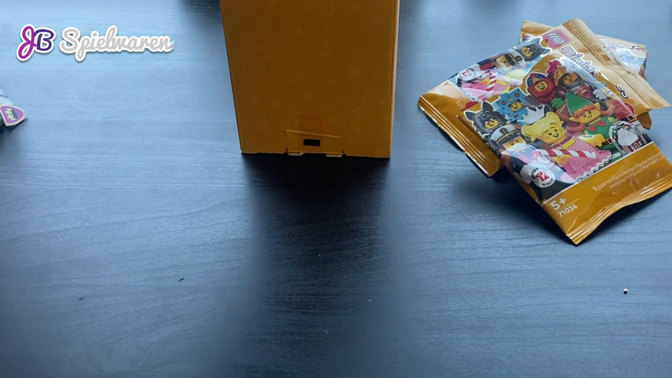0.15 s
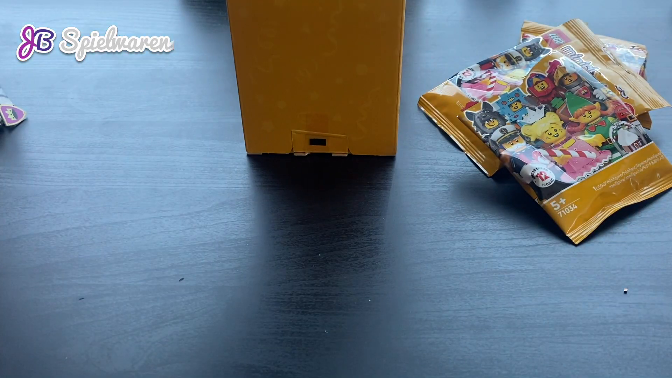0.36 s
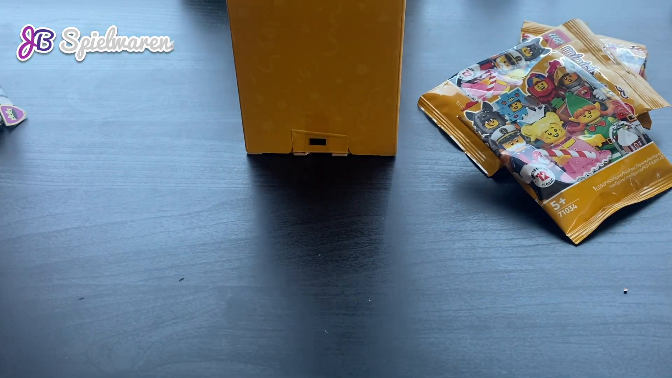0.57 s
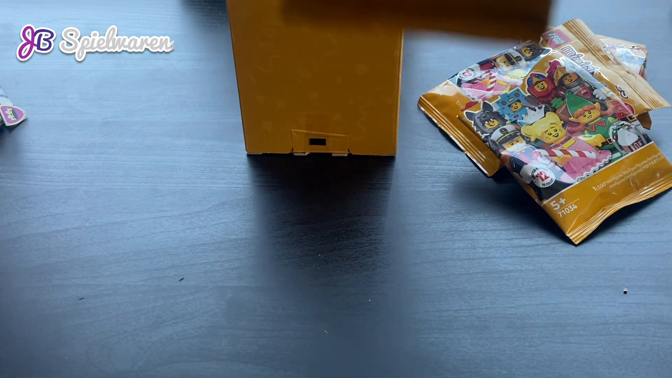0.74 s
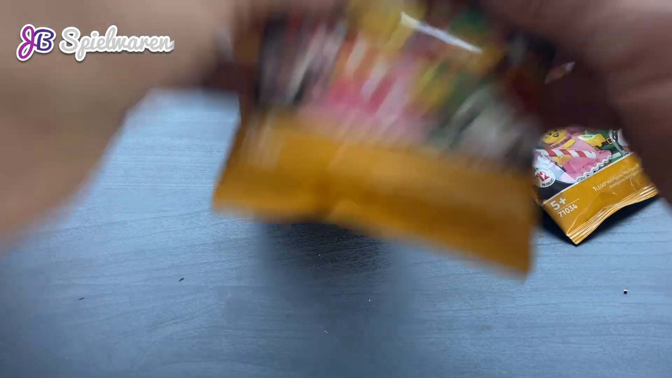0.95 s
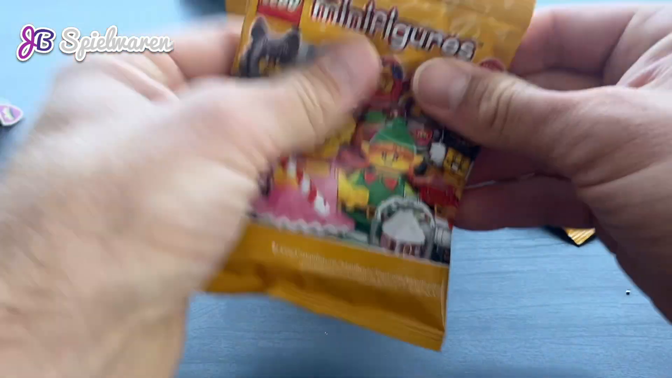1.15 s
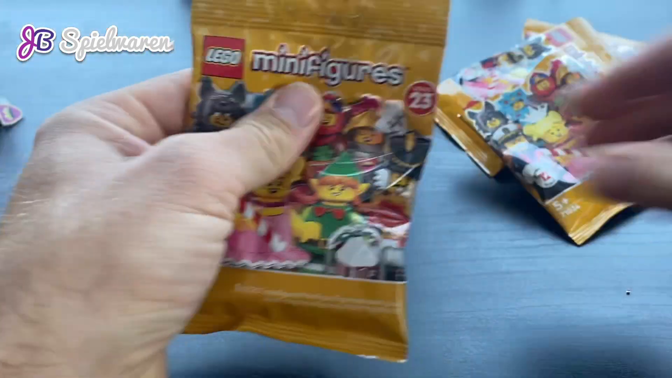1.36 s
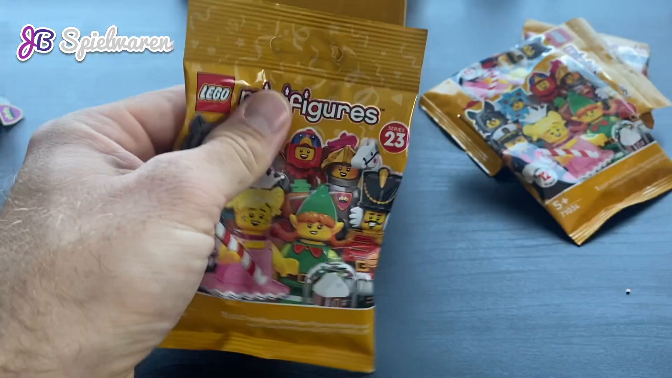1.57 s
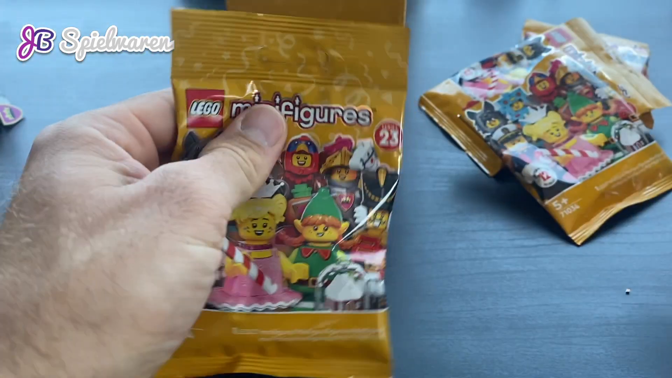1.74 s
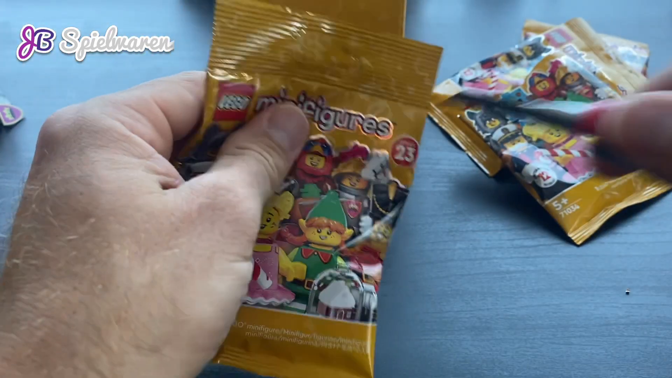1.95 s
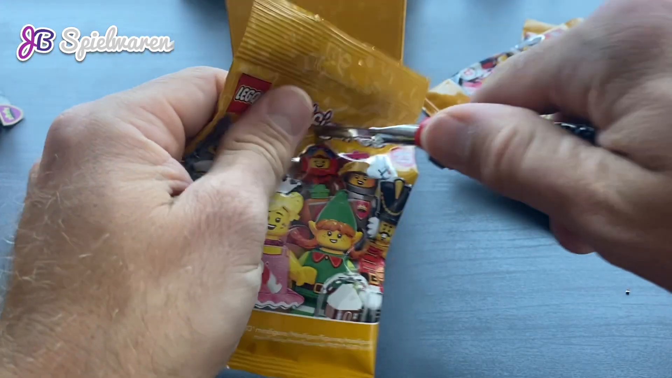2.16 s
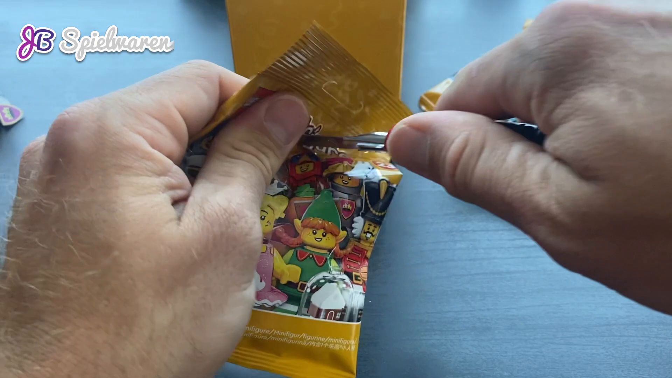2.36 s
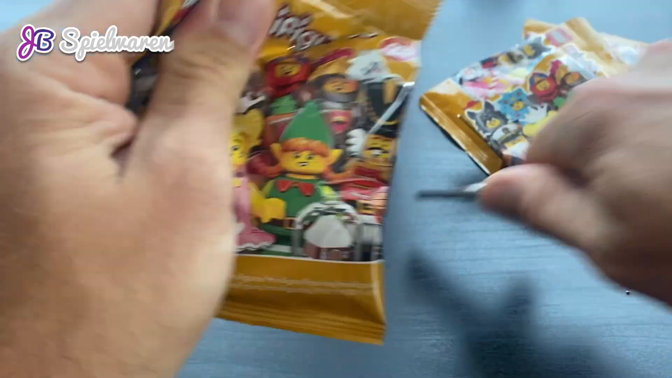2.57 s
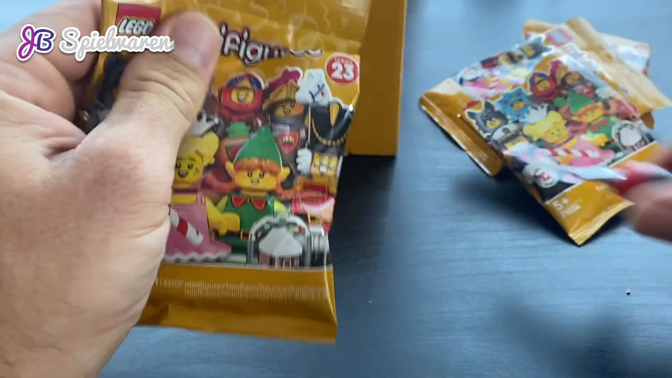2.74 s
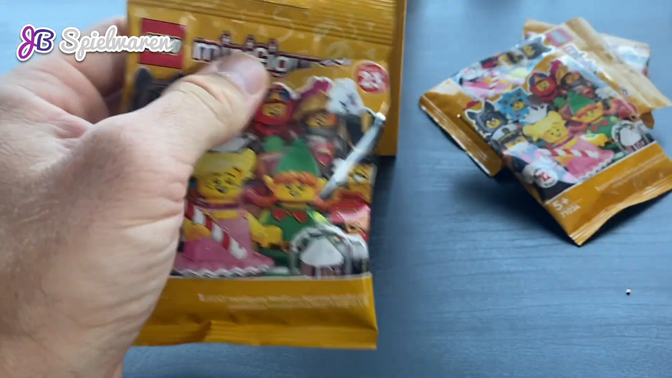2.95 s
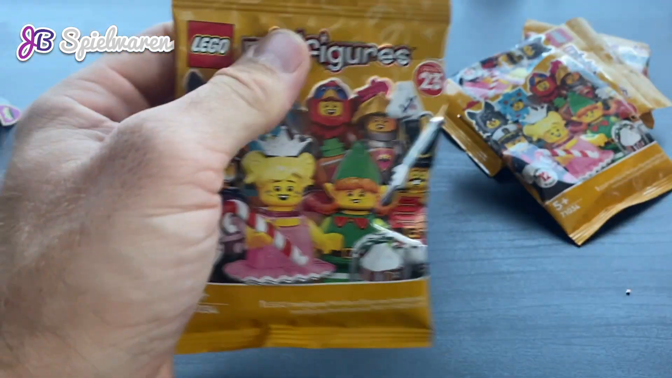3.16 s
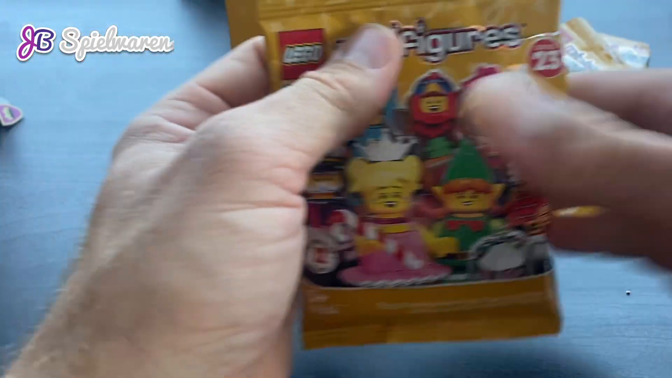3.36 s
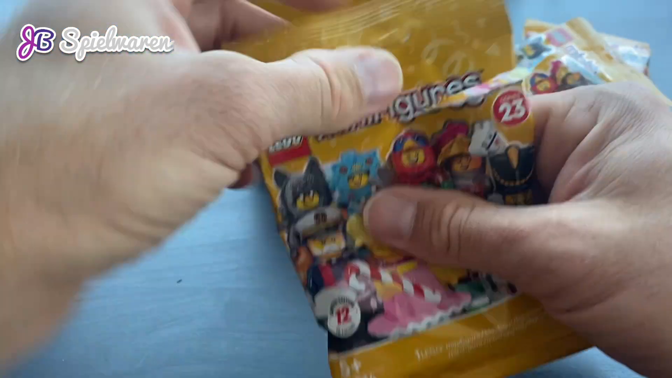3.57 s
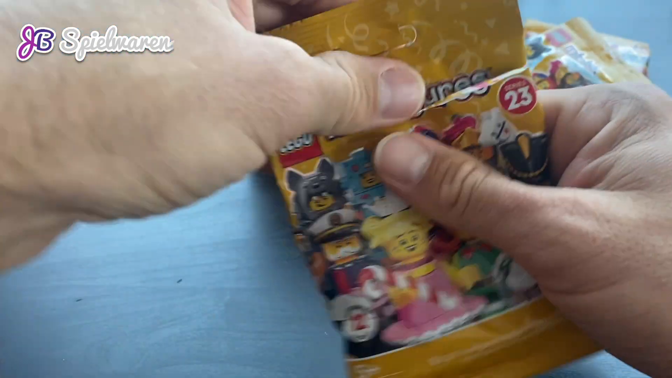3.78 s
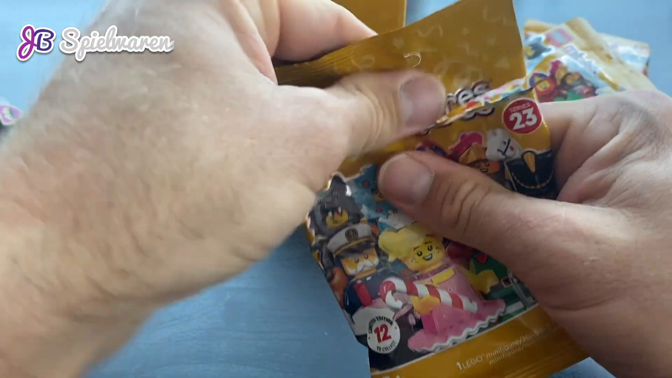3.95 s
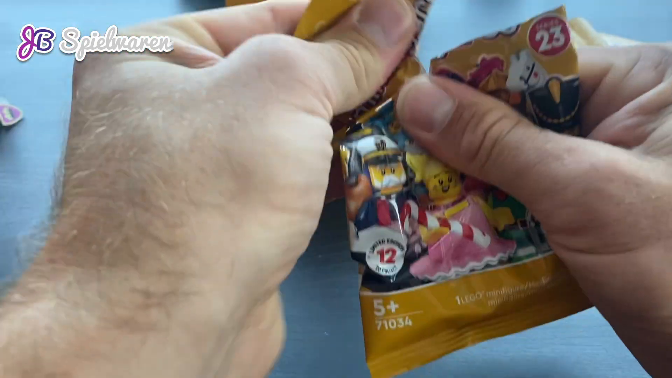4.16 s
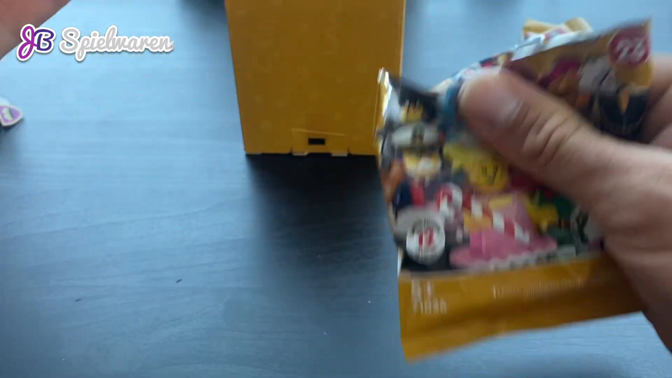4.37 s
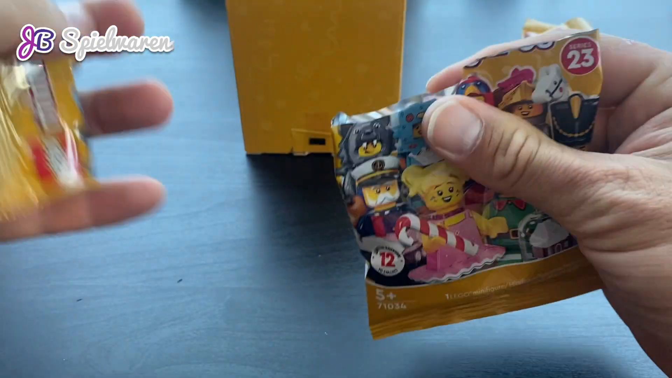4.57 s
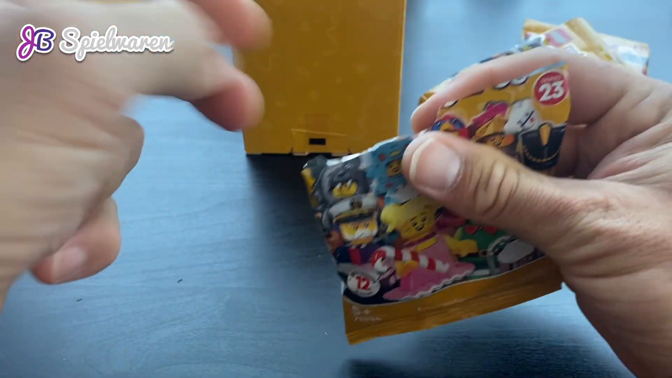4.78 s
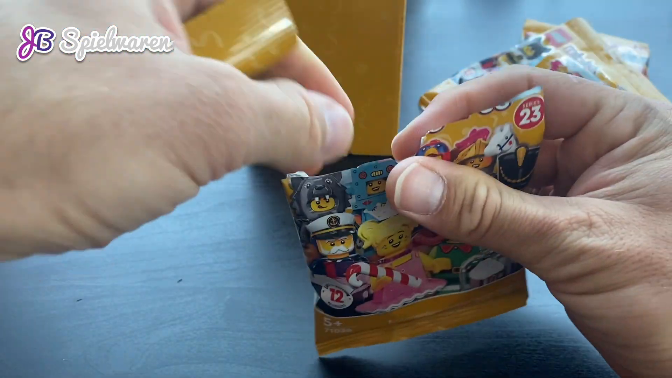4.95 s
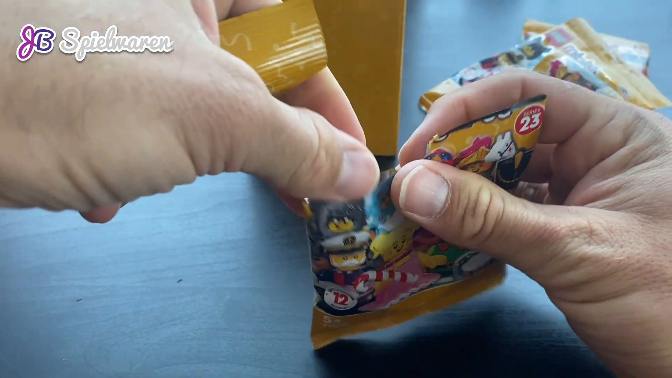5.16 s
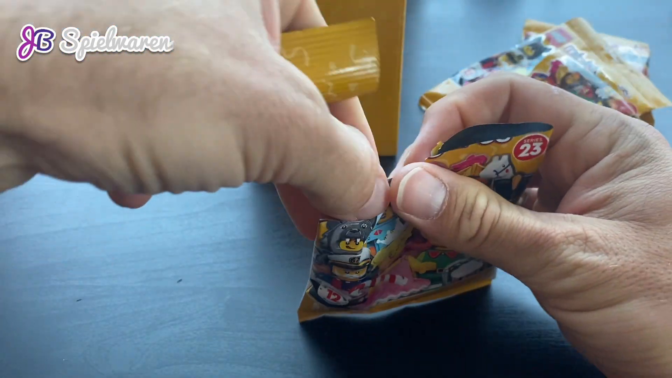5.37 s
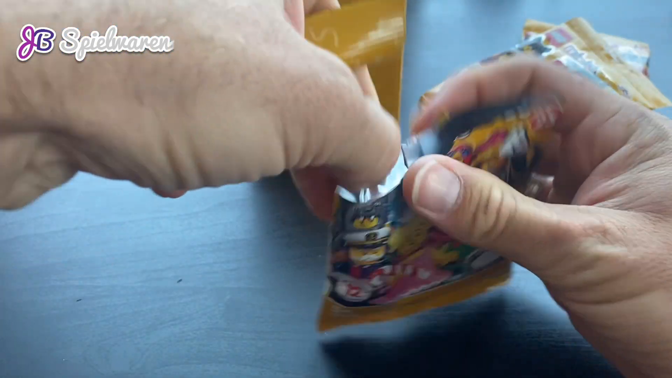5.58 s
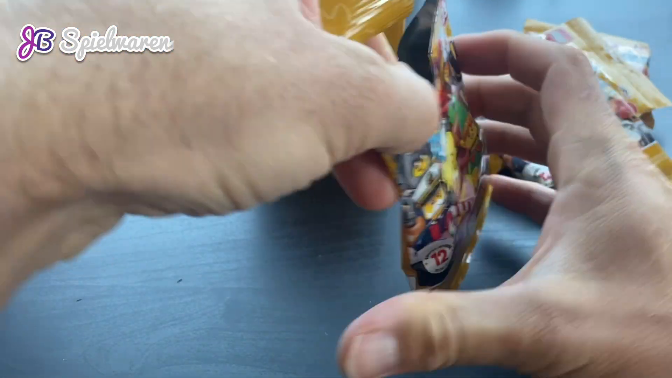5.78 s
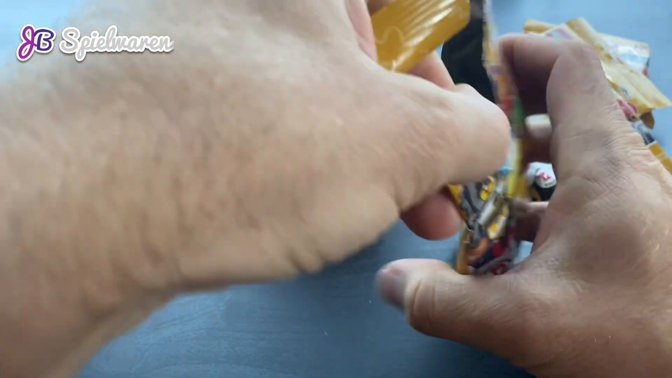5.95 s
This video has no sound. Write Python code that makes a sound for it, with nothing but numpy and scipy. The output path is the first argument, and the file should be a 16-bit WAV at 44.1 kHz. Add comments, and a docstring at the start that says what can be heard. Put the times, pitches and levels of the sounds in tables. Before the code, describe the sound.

Hollow cardboard rubbing, then close, dry foil crackling with quick rips and low pops, a light table knock midway, and sparser crinkles to the end.

```python
"""Something rubs along a hollow cardboard box on a wooden table; a foil packet is pierced and torn open.
Creases snap one by one over a finer crinkle, with rips and low pops; midway a small knife is put down.
Noise bursts ringing in facets make the foil, decaying modes the table, resonant friction the box.
Small room, two closely spaced microphones; the fingers work mostly nearer the left one."""
import sys
import numpy as np
from scipy import signal
from scipy.fft import rfft, irfft
from scipy.io import wavfile
from scipy.ndimage import uniform_filter1d

SR = 44100
rng = np.random.default_rng(int(sys.argv[2]) if len(sys.argv) > 2 else 0)


def transcribe(signal):
    """Save signal, clipped to [-1, 1], as a 16-bit WAV file at the path in sys.argv[1]."""
    frames = np.atleast_2d(signal).T
    limited = np.clip(frames, -1, 1)
    pcm = np.round(limited * 32767).astype(np.int16)
    wavfile.write(sys.argv[1], SR, pcm)


N = 265482

# colour of the still room's air: (frequency [Hz], relative spectrum level [dB])
AIR_COLOUR = [(30, 31), (100, 29.5), (400, -6.5), (16000, -29.5)]
# reflections from near surfaces: (delay left [ms], delay right [ms], level [dB])
NEAR_ECHOES = [(9.2, 9.7, -16.5)]
ECHO_DULL_HZ = 9000   # the surfaces swallow the top of the treble
# reverberation bands: (low edge [Hz], high edge [Hz], relative energy [dB], t60 [s])
ROOM_TAIL = [(101.7, 330, -21.5, 0.87), (487, 1040, -11, 0.14), (1560, 5540, -10, 0.2),
             (4500, 7400, -19.5, 0.11), (7900, 36000, -18.5, 0.19)]
# hard things nearby that ring on: (frequency [Hz], relative level [dB])
NEARBY_RINGS = [(841, -15.5), (999, -19), (2460, -17), (3603, -19.5)]
NEARBY_T60_S = 0.15
# soft bumps of hands and arms: (time [s], level [dB], spread of the swell [s])
SOFT_BUMPS = [(0.25, -52.5, 0.042), (0.99, -42.5, 0.037), (1.405, -44, 0.016), (1.46, -34.5, 0.02),
              (1.51, -48, 0.023), (1.595, -38.5, 0.018), (2.943, -58, 0.062), (3.789, -31, 0.0095),
              (3.9, -45.5, 0.031), (4.254, -53, 0.08)]
# knocks of knife and hands on the table: (time [s], relative level [dB], contact sharpness [Hz])
TABLE_CONTACTS = [(1.589, -42, 500), (1.596, -37.5, 900), (1.613, -47, 900), (2.877, -45, 704),
                  (2.995, -43, 1200), (3.111, -30, 1500), (3.135, -29, 920), (3.169, -32, 1370),
                  (3.19, -35, 900)]
# modes struck by each knock, of the table top and (1070 and 1460 Hz) the knife: (nominal frequency [Hz], mean
# relative level [dB], t60 [s])
KNOCK_MODES = [(101, 7, 0.078), (136.8, 4, 0.34), (242.3, 5.5, 0.16), (282, 14, 0.034), (373, 5.5, 0.15),
               (460, -4.5, 0.37), (516, 7, 0.11), (544, 5.5, 0.14), (632, 0.5, 0.06), (685, 0, 0.071),
               (1070, -3, 0.17), (1460, 1, 0.13)]
# panels of the cardboard box: (frequency [Hz], width [Hz], relative level [dB])
BOX_PANELS = [(239.7, 14, 1), (390, 36, -3.5), (635, 107, -1.5), (800, 260, -6)]
# rubs along the box: (time [s], spread [s], level [dB], relative hollow ring [dB], nominal hollow pitch [Hz])
BOX_RUBS = [(0.045, 0.012, -41.5, 0.5, 649.3), (0.1, 0.019, -41.5, -1, 701.4), (0.183, 0.01, -49.5, 4, 681),
            (0.247, 0.024, -37, 0, 756), (0.352, 0.0098, -43, -15, 687.7), (0.379, 0.017, -43, 11.5, 690.6),
            (0.438, 0.0033, -43, 9.5, 749.3)]
HOLLOW_WIDTH_HZ = 51
# fingertips sliding on the film: (time [s], spread [s], rasp level [dB], hiss level [dB])
FINGER_STROKES = [(1.136, 0.012, -38, -47), (1.182, 0.014, -34.5, -50), (1.536, 0.021, -41, -52),
                  (1.707, 0.021, -46.5, -43), (2.938, 0.065, -51.5, -54.5), (3.003, 0.0065, -36.5, -46),
                  (3.656, 0.0066, -45, -52), (5.07, 0.0076, -51, -63.5), (5.287, 0.067, -48.5, -48),
                  (5.828, 0.0056, -34, -52)]
# colour of the rasp: (frequency [Hz], relative spectrum level [dB])
RASP_COLOUR = [(250, -0.5), (900, 6), (1600, 1.5), (3000, -1)]
# colour of the whole sheet's crinkle: (frequency [Hz], relative spectrum level [dB])
SHEET_COLOUR = [(120, -3.5), (320, 2), (700, -4), (1200, -4), (2800, -2)]
# colour of the small facets' crinkle: (frequency [Hz], relative spectrum level [dB])
FACET_COLOUR = [(4000, 12), (6500, 10), (10000, 5), (14000, -5.5)]
# squeezes and shifts of the grip: (time [s], length [s], relative level [dB], relative crispness [dB])
FINGER_GRIPS = [(0.025, 0.17, -41.5, -3.5), (0.201, 0.061, -42.5, -2.5), (0.338, 0.11, -42, -2.5),
                (0.518, 0.17, -48, -16), (0.779, 0.06, -29.5, 0), (0.932, 0.064, -27, -1),
                (1.071, 0.4, -44, -8), (1.564, 0.16, -46, -5.5), (2.088, 0.065, -35, 0.5),
                (2.614, 0.18, -48, -1.5), (3.395, 0.18, -32, -2.5), (3.675, 0.12, -37.5, -1),
                (3.794, 0.2, -48, -5), (3.972, 0.052, -32.5, 0.5), (4.174, 0.0287, -45, 7),
                (4.374, 0.058, -38, -2.5), (4.477, 0.11, -46.5, 8), (4.639, 0.086, -45, 6),
                (5.15, 0.038, -40, 1), (5.229, 0.24, -50.5, -4.5), (5.494, 0.053, -38, 0),
                (5.61, 0.076, -45.5, 0), (5.777, 0.1, -43.5, -6), (5.982, .04, -39.5, -9)]
GRIP_ATTACK_S, GRIP_SAG_DB_PER_S, GRIP_RELEASE_DB_PER_S = 0.011, 38, 338.5
RESTING_DB = -59   # the packet stirs even when it is only held
BUCKLE_DB, BUCKLE_RANGE_DB = -43, 6.5   # below this pressure fingers mostly slide, above it film buckles
# rips, where cracks run together: (start [s], end [s], body level [dB], crisp level [dB])
RIP_RUNS = [(0.955, 0.971, -28, -24.5), (2.434, 2.467, -17.5, -23), (2.445, 2.473, -29, -27),
            (3.991, 4.002, -35, -21), (4.178, 4.211, -23, -21.5), (4.694, 4.733, -47, -32.5)]
# the whole packet buckles: (time [s], relative level [dB], pitch [Hz])
PACKET_POPS = [(0.977, -18.5, 374), (1.012, -23.5, 400), (2.44, -20, 408), (2.4707, -14.5, 246),
               (4.168, -23.5, 282), (4.202, -25, 394)]
POP_T60_S, POP_RISE_S = 0.027, 0.00017
# single creases: (time [s], relative level [dB], relative brightness [dB per octave], facet pitch [Hz])
CREASE_SNAPS = [(0.111, -40, -0.5, 696), (0.3028, -34.5, 3.5, 1740), (0.3349, -39.5, 5.5, 5700),
                (0.3488, -36, 5.5, 7800), (0.4965, -47.5, -0.5, 1620), (0.587, -45, -0.5, 1320),
                (0.635, -51, 0.5, 3290), (0.6565, -56, -1, 1680), (0.679, -50, -2.5, 1170),
                (0.7099, -51.5, 5.5, 5830), (0.784, -29.5, -2, 1580), (0.7961, -19, 1, 10300),
                (0.8022, -24, 1, 1750), (0.818, -42, 8.5, 6560), (0.8291, -31.5, 5.5, 1420),
                (0.8497, -24, 3, 6140), (0.8572, -30, -0.5, 9300), (0.882, -30, 2, 1320),
                (0.906, -35, 3, 2630), (0.9338, -31, 2, 7790), (0.949, -29.5, 4, 1410),
                (0.9585, -38.5, 7.5, 8700), (0.9666, -41.5, 8.5, 2740), (0.9861, -35, 1.5, 1900),
                (1.031, -37.5, 3.5, 980), (1.043, -35.5, 3, 1640), (1.0722, -33.5, 2, 1450),
                (1.0746, -44, 3, 1400), (1.112, -31.5, 2.5, 9400), (1.168, -32, 3.5, 826),
                (1.172, -41, 5, 960), (1.218, -32, 2, 1690), (1.2278, -29, 3.5, 9000),
                (1.239, -41, 5, 9260), (1.252, -37.5, 3.5, 3260), (1.263, -32.5, 3.5, 1680),
                (1.2749, -30.5, 1, 3220), (1.281, -31.5, 3, 4760), (1.2957, -35, 0, 1670),
                (1.341, -51.5, -3, 830), (1.367, -35.5, 0.5, 9100), (1.378, -37, 2, 7790),
                (1.3949, -36.5, 4.5, 830), (1.413, -37, 3, 930), (1.5401, -38, 0.5, 5200),
                (1.5697, -34.5, 0, 1170), (1.8121, -35.5, 0, 870), (1.831, -35.5, 4, 2280),
                (1.866, -46, 1, 830), (1.934, -36.5, 3.5, 1400), (1.969, -38.5, 1.5, 990),
                (1.988, -42, 0.5, 1700), (2.0087, -48.5, 0.5, 1990), (2.0888, -34, 0.8, 1140),
                (2.0984, -38.5, -4, 985), (2.136, -30.5, 1.5, 4000), (2.145, -37, 5, 6700),
                (2.1497, -45, 8, 8950), (2.1787, -40, 2.5, 7790), (2.2097, -31, 3, 9200),
                (2.329, -28, 3, 10800), (2.352, -40.5, 0.5, 9400), (2.3778, -49.5, 4, 4600),
                (2.418, -40.5, 3.5, 3290), (2.441, -22, 2, 970), (2.4636, -17, 1, 1010),
                (2.468, -20.5, 0, 2710), (2.476, -37, 6, 980), (2.5319, -32.5, 2.5, 1880),
                (2.599, -36.5, 4, 6900), (2.6223, -36, 2.5, 1380), (2.6702, -45.5, 4, 1380),
                (2.695, -44.5, -2, 4000), (2.719, -44.5, -1, 1920), (2.743, -41.5, 6.5, 2000),
                (2.7584, -41, 1.5, 5460), (2.78, -45.5, 2, 4500), (2.804, -43, -1.5, 960),
                (2.8537, -42.5, 4, 5200), (2.8643, -44.5, 1.5, 3880), (2.971, -39.5, 1.5, 960),
                (3.027, -35.5, 0, 9150), (3.0296, -34.5, 3, 4630), (3.0331, -34.5, 1.5, 2720),
                (3.0997, -39, 0, 2000), (3.1125, -31, 0, 1310), (3.119, -37, -1.5, 1900),
                (3.133, -41, 0, 1300), (3.171, -42.5, -4, 1100), (3.288, -53, -1.5, 1650),
                (3.316, -47, 1, 3270), (3.3499, -41.5, 4, 3370), (3.402, -34, -0.5, 5500),
                (3.4109, -32.5, 5, 2740), (3.422, -30, 2, 740), (3.4464, -32.5, 2.5, 820),
                (3.465, -41, 5, 3910), (3.486, -41.5, 4.5, 7740), (3.5337, -31, 1, 9000),
                (3.5469, -37, -2.5, 3370), (3.709, -34.5, -0.3, 5560), (3.7322, -43, 2, 2800),
                (3.753, -33, 0.5, 5400), (3.8043, -35, 2, 9200), (3.832, -36, 1, 910),
                (3.872, -35, 3, 1450), (3.9325, -40, 1, 1610), (3.9401, -41.5, -1, 3260),
                (3.955, -40.5, 2.5, 4060), (3.9764, -41.5, 2.5, 4650), (3.991, -34.5, 4.5, 3200),
                (3.997, -32, 0, 9260), (4.0073, -39, 2.5, 3240), (4.0269, -32.5, 3, 2720),
                (4.04, -42, 4, 3300), (4.155, -57, 15, 590), (4.1637, -22, 1.5, 9400),
                (4.174, -26.5, 4.5, 5660), (4.1976, -30, 5.5, 7660), (4.2176, -30.5, 4, 2320),
                (4.2507, -37.5, 4, 1420), (4.311, -41, 6, 4000), (4.321, -42, 3.5, 2970),
                (4.3655, -46, 2.5, 7300), (4.3808, -44, 5.5, 1960), (4.4218, -36.5, 2.5, 735),
                (4.4327, -42, -2, 1140), (4.451, -45.5, 2.5, 4500), (4.49, -43.5, 0.5, 4570),
                (4.5435, -37.5, 7, 6940), (4.556, -45, 2, 5440), (4.581, -47.5, 6, 5660),
                (4.625, -38.5, 5, 3670), (4.6535, -36, 6.5, 7240), (4.6568, -28, 6.5, 5400),
                (4.66, -31.5, 6, 7050), (4.675, -33.5, 3, 3900), (4.698, -40, 6.5, 5400),
                (4.713, -44, 8, 7000), (4.721, -40, 8.5, 7800), (4.771, -40, 2.5, 1160),
                (4.8256, -39, 3.5, 1640), (4.837, -32.5, 1.4, 1150), (4.885, -34, 1, 9300),
                (4.9278, -43, 4.5, 2410), (5.136, -33, 0.5, 3130), (5.1793, -41, 2.5, 9200),
                (5.2291, -41, -0.5, 3100), (5.2933, -51, 2, 9260), (5.358, -50.5, 3.5, 1380),
                (5.4473, -51, 2.5, 11000), (5.462, -49.5, 1.5, 2280), (5.504, -45.5, 2, 6540),
                (5.5366, -32.5, 3, 1140), (5.5587, -27.5, 0.5, 1140), (5.635, -37, 0.5, 2600),
                (5.646, -40, 4.5, 3160), (5.6878, -47, 4, 1170), (5.9414, -44.5, 2, 2280),
                (6.0137, -34.5, -1, 1380)]
# how the film radiates: (low edge [Hz], high edge [Hz], relative share [dB], t60 [ms], lateness [ms])
FILM_BANDS = [(126, 457, -1, 34.5, 1.3), (340, 860, -2.5, 18, 0.23), (760, 2680, 3, 21, 0.36),
              (2880, 5560, 0.5, 17.5, 0.028), (4760, 8540, 0.5, 10, 0.0084), (7900, 12140, -6.5, 12.4, .02),
              (11200, 16000, -12, 7.7, .01)]
# where the fingers work the film: (time [s], mean lead at the left microphone [ms])
FINGER_PLACE = [(0, 0.075), (.85, 0.06), (1.3, 0.052), (1.95, 0.11), (2.5, 0.095), (3.05, -0.017),
                (3.75, 0.099), (4.2, 0.041), (4.62, -0.036), (4.85, 0.11), (6.0, 0.0043)]
# a snap's brightness tilts its spectrum about the pivot and levels off at the top
SNAP_PIVOT_HZ, SNAP_TOP_HZ = 1900, 9500
# brighter snaps come from narrow strips, which lose lows: dB lost per step of extra brightness
NARROW_DB_PER_OCTAVE, NARROW_LOSS_DB = 4, 2.5
TREBLE_HZ, TREBLE_LAG_SAMPLES, CUTOFF_HZ = 8000, 8, 16000


def from_db(db):
    """Decibels to an amplitude factor."""
    return 10 ** (np.asarray(db) / 20)


def rms_one(x):
    """Scales x to an rms of 1."""
    return x / np.sqrt(np.mean(x ** 2) + 1e-20)


def band(x, low, high):
    """Causal band-pass."""
    high = min(high, .45 * SR)
    sos = signal.butter(2, [min(low, .9 * high), high], "band", fs=SR, output="sos")
    return signal.sosfilt(sos, x + 1e-18)


def coloured(x, spectrum, low, high):
    """Gives x a smooth spectrum between two edges; rms 1."""
    hz, db = np.transpose(spectrum)
    f = np.maximum(np.fft.rfftfreq(N, 1 / SR), 1)
    colour = from_db(np.interp(np.log(f), np.log(hz), db))
    return rms_one(band(irfft(rfft(x) * colour, N), low, high))


def drift(rate):
    """A random wander of rms 1 with `rate` new values per second."""
    knots = rng.standard_normal(N // 20)
    return rms_one(np.interp(np.arange(N) / SR * rate, np.arange(len(knots)), knots))


def evened(x):
    """Noise with its slow swings of level taken out; rms 1."""
    return rms_one(x / np.sqrt(np.abs(uniform_filter1d(x ** 2, SR // 30)) + 1e-12))


def resonance(x, hz, width):
    """One resonance with gain 1 at its top."""
    return signal.lfilter(*signal.iirpeak(hz, hz / width, fs=SR), x)


def swell(t, centre, spread):
    """A bell-shaped rise and fall about its centre."""
    return np.exp(-.5 * ((t - centre) / spread) ** 2)


def add(out, x, s):
    """Mixes x into out from time s."""
    i = int(np.clip(round(s * SR), 0, N - 1))
    out[..., i:i + x.shape[-1]] += x[..., :N - i]


def placed(x, lead_ms, pan_db, detour=0.85, shadow_hz=330):
    """The nearer microphone hears x earlier and louder; long waves bend round, later but unshadowed.

    Positive lead and pan favour the left."""
    size = x.shape[-1]
    f = np.fft.rfftfreq(size, 1 / SR)
    short = f ** 2 / (f ** 2 + shadow_hz ** 2)
    delay_ms = lead_ms * (1 + detour / (1 + (f / 1500) ** 2))
    # half the difference goes to each microphone
    turn = np.exp(1j * np.pi * f * delay_ms / 1000) * from_db(pan_db * short / 2)
    return np.array([irfft(rfft(x) * turn, size), irfft(rfft(x) / turn, size)])


def room_air():
    """Steady coloured noise, partly shared by the two microphones."""
    noise = rng.standard_normal(N) + .5 * rng.standard_normal((2, N))
    return from_db(-70) * coloured(noise, AIR_COLOUR, 29, 16000)


def sympathy(t):
    """Narrow resonances that every sound wakes in nearby things, with a phase for each microphone."""
    ring = 0
    for hz, db in NEARBY_RINGS:
        ring = ring + from_db(db) * np.sin(2 * np.pi * hz * t + rng.uniform(-0.53, 1, (2, 1)))
    return ring * from_db(-60 * t / NEARBY_T60_S) / np.sqrt(NEARBY_T60_S * SR)


def room(x, onset_s=0.0058):
    """Adds a close reflection, a diffuse tail decaying band by band, and the ring of nearby things."""
    t = np.arange(SR // 2) / SR
    response, onset = np.zeros((2, len(t))), np.clip(t / onset_s - .5, 0, 1)
    for low, high, db, t60 in ROOM_TAIL:
        tail = band(rng.standard_normal(response.shape), low, high)
        tail = rms_one(tail * onset * from_db(-60 * t / t60))
        response += tail * from_db(db) * np.sqrt(2 * (high - low) / SR / len(t))
    response += onset * sympathy(t)
    reflection = signal.lfilter(*signal.butter(1, ECHO_DULL_HZ, fs=SR), t == 0)
    for *delays_ms, db in NEAR_ECHOES:
        for side, ms in enumerate(delays_ms):
            response[side] += from_db(db) * np.roll(reflection, round(ms * SR / 1000))
    return x + signal.fftconvolve(x, response, axes=1)[:, :N]


def bumps(low_hz=40, high_hz=110, apart=0.25):
    """Flesh against the table and packet gives short dull swells of rumble."""
    t = np.arange(N) / SR
    level = sum(from_db(db) * swell(t, s, spread) for s, db, spread in SOFT_BUMPS)
    rumble, side = (evened(band(rng.standard_normal(N), low_hz, high_hz)) for _ in range(2))
    # the side noise is opposite at the two microphones
    return (placed(rumble, -.05, -1.2) + apart * side * [[1], [-1]]) * level


def table_knocks(clatter_db=4.5, clatter_s=0.019, rattle_db=4.0):
    """Each contact strikes the modes of table and knife anew, with a rattling clatter; soft contacts are dull."""
    t, out = np.arange(SR // 2) / SR, np.zeros(N)
    hz, mode_db, t60 = np.transpose(KNOCK_MODES)[:, :, None]
    for s, db, sharp_hz in TABLE_CONTACTS:
        strength = from_db(mode_db + 2 * rng.standard_normal(hz.shape)) * rng.choice([-1, 1], hz.shape)
        detune = 1 + .02 * rng.standard_normal(hz.shape)
        modes = strength * np.sin(2 * np.pi * hz * detune * t) * from_db(-60 * t / t60)
        rattle = from_db(clatter_db + rattle_db * drift(400)[:len(t)])
        clatter = band(rng.standard_normal(len(t)), 100, 2900) * np.exp(-t / clatter_s) * rattle
        contact = signal.butter(1, sharp_hz, fs=SR)
        add(out, from_db(db) * signal.lfilter(*contact, modes.sum(0) / 2 + clatter), s)
    return placed(out, -0.014, -11.5)


def box_rubs(hollow_db=-4.5, judder_db=2.0, waver=0.0252):
    """Uneven friction along the box excites its cardboard panels and the air inside, whose pitch shifts."""
    t = np.arange(N) / SR
    times, *_, hollow_hz = np.transpose(BOX_RUBS)
    mean_hz = hollow_hz.mean()
    friction = rng.standard_normal(N) * from_db(judder_db * drift(87.8))
    panels = 0
    for k, (hz, width, db) in enumerate(BOX_PANELS):
        panels = panels + (-1) ** k * from_db(db) * resonance(friction, hz, width)
    panels = rms_one(band(panels, 110, 2800))
    hollow = resonance(resonance(friction, mean_hz, HOLLOW_WIDTH_HZ), mean_hz, HOLLOW_WIDTH_HZ)
    hollow = evened(hollow) * from_db(hollow_db)
    # reading the ring faster or slower bends its pitch
    bend = np.interp(t, times, hollow_hz) / mean_hz * (1 + waver * drift(34.85))
    hollow = np.interp(np.cumsum(bend) / SR, t, hollow)
    out = 0
    for s, spread, db, ring_db, _ in BOX_RUBS:
        out = out + from_db(db) * swell(t, s, spread) * (panels + from_db(ring_db) * hollow)
    return placed(out, 0.11, 1.2)


def film(cracks, body, crisp):
    """Cracks sound through the whole sheet (body) and from their own small facets (crispness)."""
    sheet = coloured(cracks, SHEET_COLOUR, 160, 3500)
    facets = coloured(cracks, FACET_COLOUR, 2440, 14600)
    return body * sheet + crisp * facets


def finger_rubs(judder_db=4.0):
    """Skin dragging over the film makes a dull, uneven rasp and a fine hiss."""
    t, rasp, hiss = np.arange(N) / SR, 0, 0
    for s, spread, rasp_db, hiss_db in FINGER_STROKES:
        stroke = swell(t, s, spread)
        rasp, hiss = rasp + stroke * from_db(rasp_db), hiss + stroke * from_db(hiss_db)
    friction = rng.standard_normal(N) * from_db(judder_db * drift(170))
    rub = rasp * coloured(friction, RASP_COLOUR, 74, 4800) + film(friction, 0, hiss)
    return placed(rub, 0.12, 1)


def tiny_cracks(per_s, spread_db, clump_db, rub, ring_ms, facet_db=9):
    """Clumps of tiny buckles in facets, each with its own pitch and place, over the rub of skin on film."""
    out, ms = 0, np.arange(256) / SR * 1000
    busy = from_db(clump_db * drift(45))
    pitches = np.geomspace(700, 11000, 16)
    leads_ms = rng.permutation(np.linspace(-.03, .15, len(pitches)))
    for hz, lead_ms in zip(pitches, leads_ms):
        born = rng.random(N) < per_s * busy / len(pitches) / SR
        sizes = from_db(spread_db * np.minimum(rng.exponential(1, N), 3))
        snap = rng.standard_normal(len(ms)) * np.exp(-ms / ring_ms)
        facet = snap + from_db(facet_db) * resonance(snap, hz, hz / 2)
        pair = placed(np.pad(facet, 16), lead_ms, 2.2)   # padding leaves room for the lead
        out = out + signal.oaconvolve((born * sizes)[None], pair, axes=1)[:, :N]
    return rms_one(out) + rub * rng.standard_normal((2, N))


def grip(s, length):
    """Pressure builds quickly, sags as the film gives way, and dies away when the fingers stop."""
    age = np.arange(N) / SR - s
    sag_db = GRIP_SAG_DB_PER_S * np.maximum(age, 0)
    loss_db = sag_db + GRIP_RELEASE_DB_PER_S * np.maximum(age - length, 0)
    return np.clip(age / GRIP_ATTACK_S + .5, 0, 1) * from_db(-np.minimum(loss_db, 100))


def crinkle(slide_db=-1.5, judder_db=8.5):
    """A light touch of the fingers rustles smoothly, a firm one sets off a fine crackle."""
    body = crisp = from_db(RESTING_DB)
    for s, length, db, crispness_db in FINGER_GRIPS:
        pressure = from_db(db) * grip(s, length)
        body, crisp = body + pressure, crisp + pressure * from_db(crispness_db)
    buckling = 1 / (1.0 + np.exp((BUCKLE_DB - 20 * np.log10(body)) / BUCKLE_RANGE_DB))
    cracks = tiny_cracks(per_s=700, spread_db=3.3, clump_db=2.5, rub=.22, ring_ms=0.55)
    slide = placed(rng.standard_normal(N), 0.051, 1.4) + .5 * rng.standard_normal((2, N))
    slide = slide * from_db(judder_db * drift(150))
    crackle = np.sqrt(buckling) * film(cracks, body, crisp)
    return crackle + np.sqrt(1 - buckling) * from_db(slide_db) * film(slide, body, crisp)


def rips(start_share=0.51, release_s=0.00046):
    """A tear runs as a dense chain of cracks that gathers force, then lets go."""
    t, body, crisp = np.arange(N) / SR, 0, 0
    for start, end, body_db, crisp_db in RIP_RUNS:
        corners = np.sort([start - release_s, start, end, end + release_s])
        force = np.interp(t, corners, [0, start_share, 1, 0])
        body, crisp = body + force * from_db(body_db), crisp + force * from_db(crisp_db)
    cracks = tiny_cracks(per_s=1800, spread_db=1.0, clump_db=-3.5, rub=0.073, ring_ms=1.0)
    return film(cracks, body, crisp)


def pops():
    """The taut packet springs over with a short, low pop."""
    t, out = np.arange(SR // 5) / SR, np.zeros(N)
    for s, db, hz in PACKET_POPS:
        envelope = (1 - np.exp(-t / POP_RISE_S)) * from_db(db - 60 * t / POP_T60_S)
        add(out, np.sin(2 * np.pi * hz * t) * envelope, s)
    return placed(band(out, 70, 9000), 0.077, 1.5)


def snaps():
    """A crease clicks and its facet rings for a few ms; bending waves bring the lows late."""
    gain_db, tilt_db, uneven_db = -3.0, -0.51, 1.5   # tilt is per octave
    facet_db, facet_width, rise_ms = 4.5, 0.2, 0.15   # width is a share of the pitch
    fade_in_db, fade_in_ms, click_db, click_ms = -22, 3.7, -1.5, 0.37
    left_db, pan_db_per_ms, scatter_ms = 1.5, 16, 0.059
    size, margin = 1536, 256   # samples; the margin holds the soft fade-in around the click
    times, level_db, bright_db, facet_hz = np.transpose(CREASE_SNAPS)
    ms = (np.arange(size) - margin) / SR * 1000
    cracks = 0
    for low, high, share_db, t60_ms, late_ms in FILM_BANDS:
        octaves = np.log2(min(np.sqrt(low * high), SNAP_TOP_HZ) / SNAP_PIVOT_HZ)
        extra_bright = np.maximum(bright_db - NARROW_DB_PER_OCTAVE, 0)
        db = level_db + (bright_db + tilt_db) * octaves
        db = db - NARROW_LOSS_DB * extra_bright * (low < SNAP_PIVOT_HZ)
        age = np.maximum(ms - late_ms, 0)
        ringing = (1 - np.exp(-age / rise_ms)) * from_db(-60 * age / t60_ms)
        fade_in = from_db(fade_in_db) * np.exp(-abs(ms) / fade_in_ms)
        click = from_db(click_db) * (age > 0) * np.exp(-age / click_ms)
        chance = rng.standard_normal((len(times), size + 1))   # first column: uneven level
        ring = band(chance[:, 1:] * (ringing + fade_in + click), low, high)
        ring /= np.sqrt((ring ** 2).sum(1, keepdims=True) / (.005 * SR))   # equal energy
        cracks = cracks + ring * from_db(db + share_db + gain_db + uneven_db * chance[:, 0])[:, None]
    facets = [resonance(crack, hz, hz * facet_width) for crack, hz in zip(cracks, facet_hz)]
    cracks = cracks + from_db(facet_db) * np.array(facets)
    lead_ms = np.interp(times, *np.transpose(FINGER_PLACE)) + scatter_ms * rng.standard_normal(len(times))
    lead_ms = lead_ms[:, None]
    pairs, out = placed(cracks, lead_ms, left_db + pan_db_per_ms * lead_ms), np.zeros((2, N))
    for k, s in enumerate(times):
        add(out, pairs[:, k], s - margin / SR)
    return out


def scene():
    """Packet, box and table in the quiet room; bumps and air stay without reverberation."""
    packet = finger_rubs() + crinkle() + rips() + pops() + snaps()
    return room(packet + box_rubs() + table_knocks()) + bumps() + room_air()


def record(dry, treble_db=2.0, treble_width=0.86):
    """The left treble feeds both channels, later on the left; peaks are rounded, the very top is cut."""
    f, both = np.fft.rfftfreq(N, 1 / SR), rfft(dry)
    top = np.clip((f - TREBLE_HZ) / 300 + .5, 0, 1)
    shared = both[0] * from_db(treble_db)
    left = shared * np.exp(-2j * np.pi * f * TREBLE_LAG_SAMPLES / SR)
    right = (shared + treble_width * both[1]) / np.hypot(1, treble_width)
    out = np.tanh(irfft(both * (1 - top) + np.array([left, right]) * top, N))
    return signal.sosfilt(signal.ellip(12, .5, 90, CUTOFF_HZ, fs=SR, output="sos"), out)


dry = scene()
out = record(dry)
transcribe(out)
```